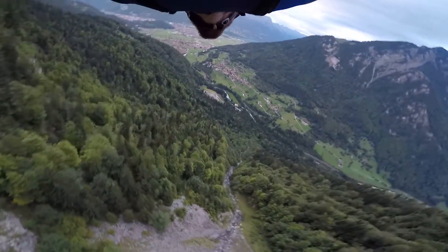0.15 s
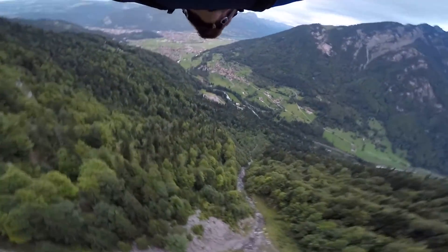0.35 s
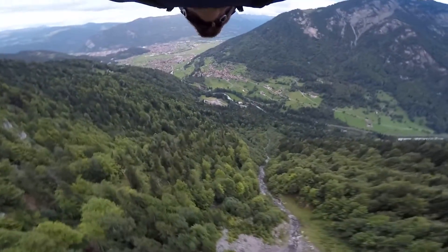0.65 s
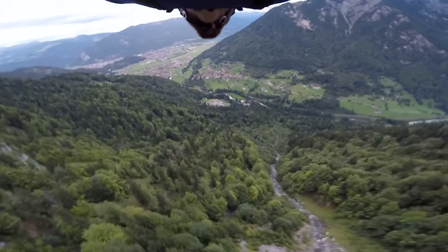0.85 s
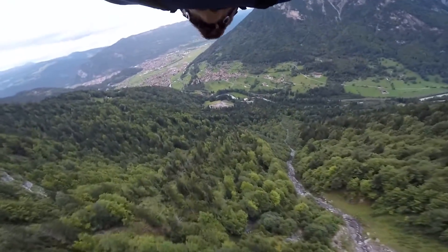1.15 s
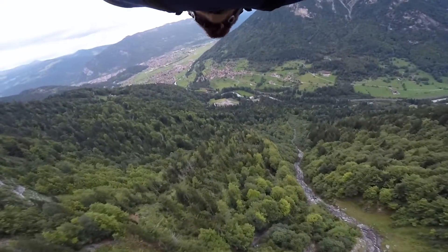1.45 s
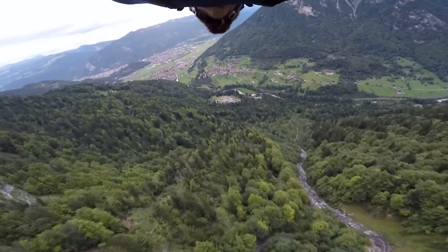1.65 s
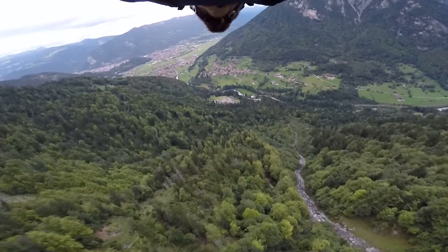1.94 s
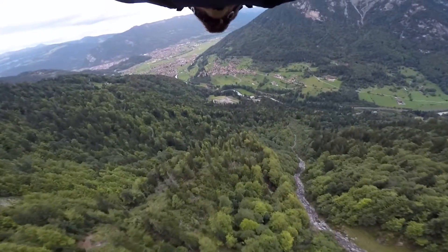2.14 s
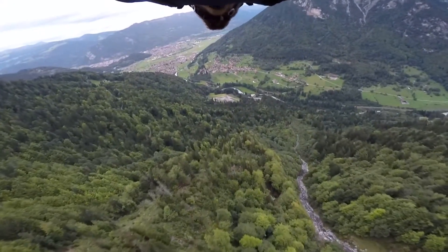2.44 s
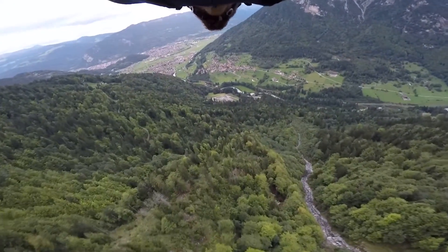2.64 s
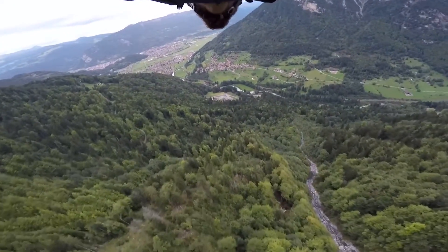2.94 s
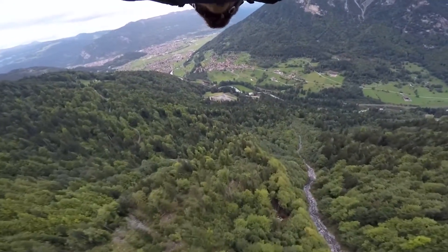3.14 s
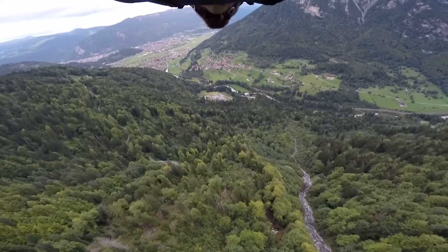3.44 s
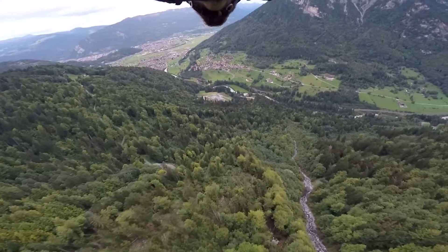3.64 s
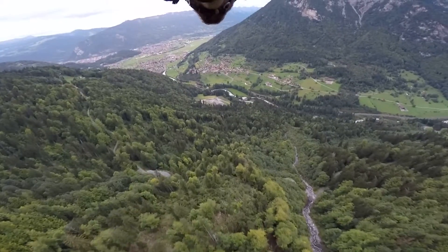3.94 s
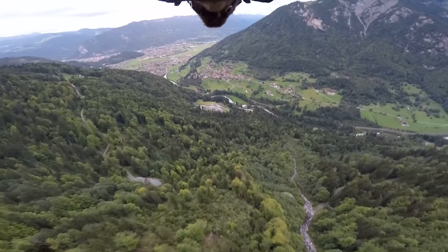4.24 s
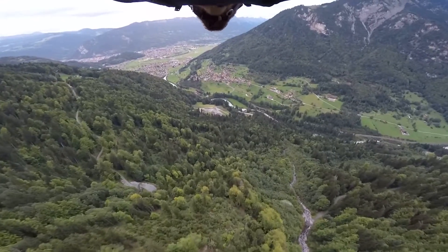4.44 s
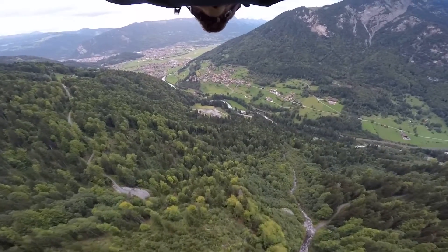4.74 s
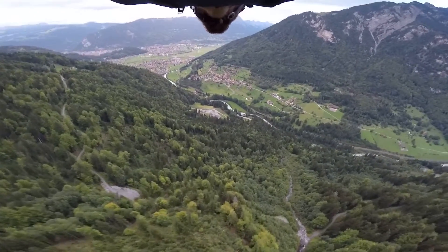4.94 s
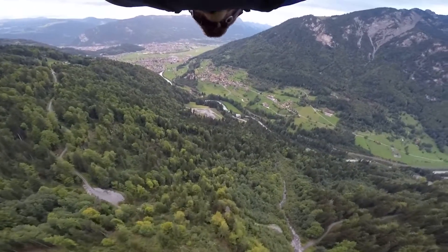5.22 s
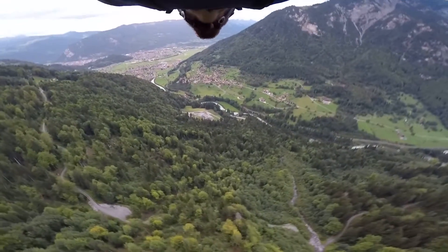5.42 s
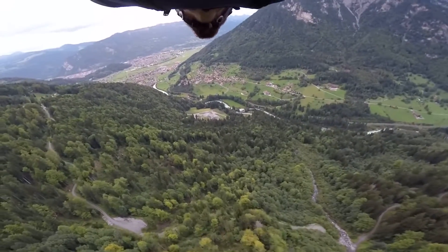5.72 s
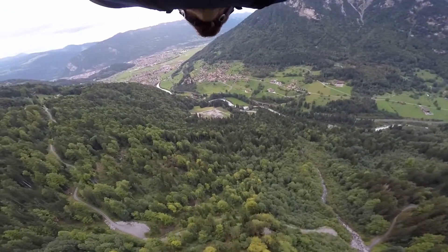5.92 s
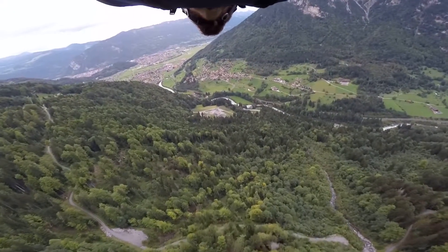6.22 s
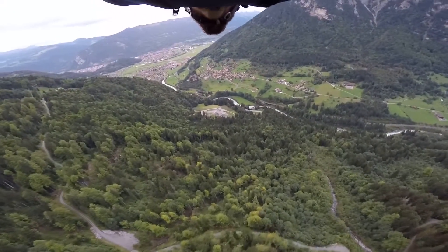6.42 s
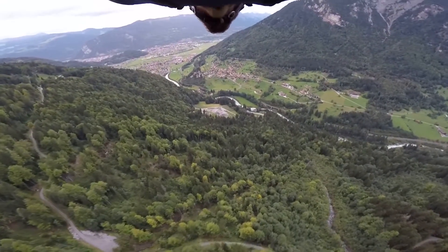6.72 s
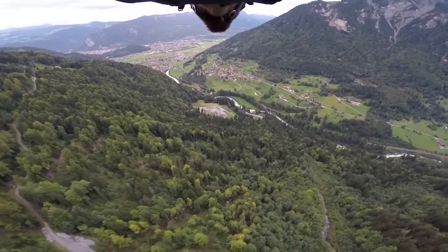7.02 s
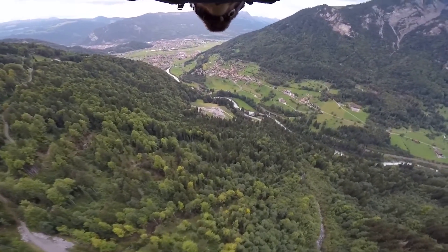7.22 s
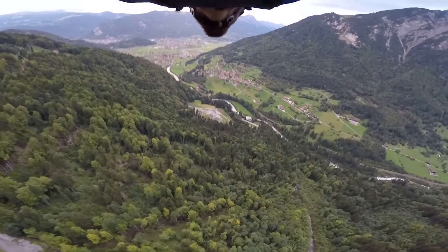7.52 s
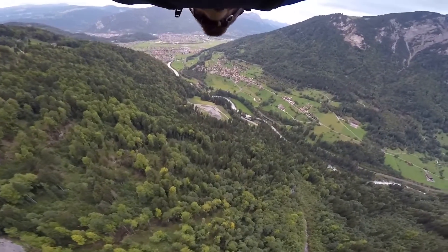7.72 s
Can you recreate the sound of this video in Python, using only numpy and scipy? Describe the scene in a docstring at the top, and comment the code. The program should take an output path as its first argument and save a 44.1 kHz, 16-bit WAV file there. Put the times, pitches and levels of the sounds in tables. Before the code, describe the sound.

A helmet microphone in fast gliding flight is overwhelmed by wind, very close, dry and loud, its peaks squeezed. At 0 seconds a hard gust hits with a sharp pop, more pops and brighter hiss, easing by about 0.6. From then on bass-heavy buffeting thumps and drums quickly without rhythm, with fluttering above it, a coarse low roar, a crackly mid rush and thin, ragged high hiss. Tiny spits and dry ticks scatter throughout. Flutter surges near 1 second; brief slaps lift the roar around 2.4 and 2.9, and again near 3.4 to 4.1. Pops return around 4.5 to 4.8, then a strong gust peaks at 5.2 amid a tight cluster of pops. The flow slackens, weakest around 6.5, though flutter stays strong to about 6 and spits continue. After 7 the hiss grows smoother, a pop lands near 7.6, and the wind swells until the end, just before 8.

```python
"""A hard gust with a sharp pop opens the scene: air rushes past a helmet camera in fast gliding flight.
The microphone sits in the housing, with no distance to the wind: large eddies buffet it in noise bands,
smaller ones roar in packets and now and then pop on the microphone port as short pressure pulses.
The port hisses and spits near its resonance in shaped noise bursts.
A quick limiter holds the peaks."""
import sys
import numpy as np
from scipy import signal
from scipy.fft import rfft, irfft, next_fast_len
from scipy.io import wavfile
from scipy.ndimage import uniform_filter1d, minimum_filter1d

SR = 44100
rng = np.random.default_rng(int(sys.argv[2]) if len(sys.argv) > 2 else 0)


def generate_wav(signal):
    """Clip the signal to [-1, 1] and save it as 16-bit WAV at the path in sys.argv[1]."""
    frames = np.transpose(np.atleast_2d(signal))
    scaled = np.clip(frames, -1, 1) * 32767
    pcm = np.round(scaled).astype(np.int16)
    wavfile.write(sys.argv[1], SR, pcm)


N = 347067

# strength of the airflow over the helmet, gusting at the start, at 5.2 s and at the end:
# time_s, level_db (about nominal flow)
FLOW = [(0, 5), (.26, 2), (.3, 1), (.58, 0), (.8, 1), (1.2, -1.1), (1.98, -1.5), (2.45, 1), (3.03, -1.5),
        (3.4, 1.4), (3.85, -0.4), (4.3, -0.5), (4.98, 2), (5.2, 4.5), (5.55, -0.5), (6.08, -0.5),
        (6.45, -2), (7.4, -0.9), (7.87, 4.5)]
# size of the large eddies, leaning from deep thumps (-) to higher drumming (+): time_s, lean_db
EDDY_LEAN = [(0, -2.0), (0.78, 1), (1.2, -1), (2.9, 0), (3.06, 2), (3.2, -1.6), (3.9, -1.5), (4.42, 1),
             (4.65, -0.5), (5.1, 0.8), (5.45, 1), (6.9, -0.5), (7.2, 2.5), (7.87, 1.9)]
# the deepest rumble, mostly below 60 Hz: time_s, level_db
RUMBLE_LEVEL = [(0, -23), (.42, -17.5), (.9, -26), (1.8, -22), (2.5, -27), (3.0, -23.5), (3.45, -25.5),
                (3.82, -22), (4.9, -27.5), (5.2, -21), (5.95, -21.5), (6.35, -28), (6.9, -18), (7.3, -25),
                (7.87, -20)]
# flutter around 200 Hz: time_s, level_db (about FLUTTER_DB)
FLUTTER_LEVEL = [(0, 1), (0.62, 1.1), (0.98, 2.5), (1.55, 3), (2.25, -1), (2.7, 1.8), (3.05, -3),
                 (3.7, -0.4), (4.85, -0.5), (5.25, 4), (6.0, 5), (6.5, -0.5), (7, -1), (7.25, -5),
                 (7.87, 4)]
# how ragged the flow over the port is: time_s, burst_share (of the hiss power, 0-1)
RAGGEDNESS = [(0, 0.8), (.7, 0.8), (1.3, 0.98), (1.85, 0.63), (2.75, 1), (3.05, 0.77), (3.7, 0.8),
              (4.7, 0.23), (5.3, 0.77), (6.1, 1), (6.8, 0.67), (7.3, 0.14), (7.87, 0.2)]

# the buffeting slackens or thumps harder: centre_s, width_s, rise_db
BUFFET_SWELLS = [(.18, .08, 1.8), (.57, 0.035, -5.5), (1.27, .025, 4.5), (1.57, .03, -2), (2.4, .1, 1.5),
                 (2.77, 0.033, 1), (2.98, .04, -3), (3.45, .035, 2.5), (3.62, 0.031, -2), (4.41, 0.037, -4),
                 (4.68, 0.049, -2), (5.12, 0.052, 1), (5.96, .035, -5), (6.33, 0.041, 1.5),
                 (6.88, 0.11, -3), (7.72, .12, -1.5)]
# the flutter surges or sags: centre_s, width_s, rise_db
FLUTTER_SURGES = [(.254, 0.01, 7), (.77, .04, 0.5), (.985, 0.04, 7), (1.39, 0.041, 5.5), (1.705, 0.021, 3),
                  (1.8, .025, 1.5), (2.18, 0.032, 6), (2.706, 0.0081, 5), (2.749, 0.0083, 4.5),
                  (3.448, 0.026, 8.5), (3.74, 0.043, 4.5), (5.29, 0.036, 4), (5.53, 0.058, 1.5),
                  (5.74, 0.022, -5.5), (5.86, 0.04, 1), (6.95, 0.052, 1), (7.37, .01, 7),
                  (7.54, 0.014, -0.5)]
# the low roar swells and sags by itself: centre_s, width_s, rise_db
ROAR_SWELLS = [(.72, 0.039, 3.5), (1.27, 0.11, 2), (1.93, .06, 0), (2.45, 0.025, -1), (3.63, 0.029, -1),
               (3.85, 0.047, 4.5), (4.16, 0.061, 3), (5.22, 0.047, 1), (6.02, 0.062, 0), (6.42, .04, -3.5),
               (7.23, 0.05, -2.5), (7.75, 0.2, -1.5)]
# larger eddies slap the housing and briefly lift roar and rush: centre_s, width_s, rise_db (of flow)
SLAPS = [(.37, 0.008, 5), (.885, 0.0091, 1.5), (2.428, 0.0066, 7), (2.469, 0.0089, 9.5), (2.95, 0.005, 7),
         (3.432, 0.0073, 2), (3.87, 0.035, 1.5), (4.14, 0.03, 2.2), (5.168, .01, 7), (5.441, 0.0046, 2),
         (7.087, 0.008, 5.5)]

# eddies bursting on the port, the smaller the sharper:
# centre_s, peak_db (before the rumble is cut), width_ms (before a random size)
POPS = [(0.011, -7, 0.24), (0.070, -12, 0.19), (0.134, -8, 0.19), (0.347, -8.5, 0.28), (1.4104, -11, 0.25),
        (2.0385, -13, 0.23), (2.4263, -9, 0.14), (2.4688, -16.5, 0.27), (2.9449, -15, .26),
        (3.6625, -10, .14), (3.881, -13, 0.14), (3.9548, -9.5, 0.2), (4.5195, -8, 0.25),
        (4.7279, -8.5, 0.17), (4.7665, -10.5, 0.18), (5.028, -4.5, 0.21), (5.1684, -10, 0.15),
        (5.18, -7.5, 0.12), (5.2617, -9, 0.12), (6.077, -17, 0.1), (6.222, -11, .21), (6.9403, -13, 0.17),
        (7.054, -12.5, 0.23), (7.083, -10.5, 0.17), (7.5853, -7.5, 0.17)]
# short spits of hiss: centre_s, crest_rms_db (before SPIT_TRIM_DB), width_ms,
# brightness_db (top sizzle against the port's resonance)
SPITS = [(0.026, -27, 1.3, -11), (0.069, -29, 1.5, -12), (0.088, -28, 0.73, -16.5), (0.173, -19, 0.76, -20),
         (0.198, -18.5, 0.82, -19), (0.263, -24, 1.8, -18), (0.444, -26, 1.2, -15.5),
         (0.465, -26, 1.1, -22), (1.0188, -24, 1, -20), (1.2347, -28, 1.4, -11),
         (1.2958, -24.5, 1.3, -16.5), (1.3302, -27, 0.74, -15), (1.4642, -30, .9, -15),
         (1.4803, -27, 0.6, -8), (2.1315, -27, 0.87, -14), (2.1396, -22, 1, -19.5), (2.3578, -23, .7, -12),
         (2.649, -29, 0.88, -15), (2.699, -30, 2.4, -10.5), (2.7533, -26.5, 1, -5),
         (3.1206, -26, 0.98, -20), (3.2426, -30, .9, -16), (3.4097, -25, 1, -20), (3.603, -25, .9, -16),
         (3.691, -26, 1, -26), (3.7994, -28, 0.67, -16), (3.9029, -23, .7, -11), (4.131, -24, 1, -18),
         (4.2042, -29, 0.77, -5), (4.3967, -28, .9, -16), (4.486, -30, 1, -8.5), (4.4987, -27.5, 1, -12),
         (4.5204, -28, .9, -19), (5.0904, -20.5, 1, -21), (5.2044, -23, 1, -16), (5.239, -23.5, 1.1, -19),
         (5.271, -23, .8, -18), (5.3661, -28, 1, -15), (5.6013, -29, 0.78, -4), (5.7042, -25, .7, -6),
         (5.826, -27, 0.88, -15), (5.841, -23, 1.1, -19), (6.1031, -17.5, 0.83, -18),
         (6.2265, -27, 0.43, -4), (6.491, -34, 0.79, -16), (6.661, -20.5, 0.61, -16),
         (6.7377, -23.5, .8, -9), (6.821, -26, .9, -19), (6.8648, -22.5, .8, -19), (6.908, -29, 1.2, -13.5),
         (7.1433, -29, .9, -18), (7.2495, -29, 1, -15)]

# spectrum of the deep rumble: pitch_hz, relative level_db
RUMBLE_COLOUR = [(10, -15), (24, -4.5), (40, -1.5), (52, 0.5), (68, -20), (100, -40)]
# spectrum of the deep thumps: pitch_hz, relative level_db
THUMP_COLOUR = [(20, -21), (38, -13), (50, -3.5), (62, 2.5), (80, 7), (96, -0.5), (112, -1.5), (160, -46)]
# spectrum of the higher drumming: pitch_hz, relative level_db
DRUM_COLOUR = [(70, -32.5), (98, -3.5), (125, -0.5), (140, -3), (160, -11.5), (220, -44)]
# spectrum of the flutter: pitch_hz, relative level_db
FLUTTER_COLOUR = [(110, -18.5), (145, -7), (170, 1.5), (210, 0.5), (260, -3.5), (320, -8), (390, -14.5),
                  (520, -30.5), (1200, -56)]
# spectrum of the low roar: pitch_hz, relative level_db
ROAR_COLOUR = [(220, -17), (340, -2), (430, -3), (620, -7), (800, -11), (980, -16.5), (1300, -22),
               (3000, -59)]
# spectrum of the rush: pitch_hz, relative level_db
RUSH_COLOUR = [(550, -15), (900, -0.5), (1100, 1.5), (1500, 0.5), (2000, -7), (2600, -11.5), (3200, -19.5),
               (4200, -19.5), (8000, -45)]
# spectrum of the crackle in the rush: pitch_hz, relative level_db
CRACKLE_COLOUR = [(300, -10), (800, 3.5), (1900, 0), (3000, -11.5), (4500, -9.5), (7000, -32.5)]
# spectrum of the smooth port hiss: pitch_hz, relative level_db
HISS_COLOUR = [(2500, -11), (3400, -13.5), (3950, -6.5), (4750, 1), (5400, -3.5), (6400, -3.5), (7300, -9),
               (8500, -15.5), (10000, -23), (12000, -35.5), (14500, -48.5)]
# spectrum of bursts and spits at the port's resonance: pitch_hz, relative level_db
SPIT_COLOUR = [(3000, -33.5), (4200, -7.5), (5050, 0.5), (6100, -4), (7000, -11), (8000, -20.5),
               (9400, -26), (10300, -33), (12000, -49), (14500, -60)]
# spectrum of the finest tears, above that resonance: pitch_hz, relative level_db
SIZZLE_COLOUR = [(5000, -23.5), (6500, 2.5), (7800, -1), (9400, -7.5), (10300, -11), (11500, -29.5),
                 (14000, -41.5)]

# each layer's level at nominal flow (dB), and how many dB it gains per dB of flow
BUFFET_DB, FLUTTER_DB = -12, -18.5
ROAR_DB, ROAR_FOLLOWS = -24, 1.1
RUSH_DB, RUSH_FOLLOWS = -31.5, 0.72
HISS_DB, HISS_FOLLOWS = -39, 0.46
RAGGED_HISS_DB = 0.4    # gain from wholly smooth to wholly ragged flow
SPIT_TRIM_DB = -3.5
# small random gusts on top of the flow
GUST_DB, GUST_HZ = 0.42, 13
# the opening gust rushes and hisses more brightly; the rush drops at once, the last of the hiss dies away
OPENING_HOLD_S = 0.25
OPENING_RUSH_DB, OPENING_DROP_S = 1.5, 0.008
OPENING_HISS_DB, OPENING_RELEASE_S = 1, 0.33
# the housing rings for a moment after a pop
POP_RING_HZ, POP_RING_T60_S, POP_RING_DB = 885, 0.008, -11
# the passing vortex displaces the finer turbulence (dB of flow)
POP_HUSH_S, POP_HUSH_DB = 0.008, -3.5
CUTOFF_HZ = 14750


def from_db(db):
    """Decibels to gain."""
    return 10 ** (np.asarray(db) / 20)


def rms_one(x):
    """Scale to unit power."""
    return x / np.sqrt(np.mean(x ** 2) + 1e-20)


def in_time(rows):
    """A level curve, interpolated at every sample."""
    time_s, level = np.transpose(rows)
    return np.interp(np.arange(N) / SR, time_s, level)


def swells(rows):
    """Smooth rises and falls of level, in dB at every sample."""
    t, out = np.arange(N) / SR, np.zeros(N)
    for centre_s, width_s, rise_db in rows:
        near = slice(*np.searchsorted(t, [centre_s - 4 * width_s, centre_s + 4 * width_s]))
        out[near] += rise_db * np.exp(-((t[near] - centre_s) / width_s) ** 2 / 2)
    return out


def coloured(x, colour):
    """Give a signal a spectrum; rms 1."""
    size = next_fast_len(N)
    hz = np.maximum(np.fft.rfftfreq(size, 1 / SR), 1)
    points_hz, points_db = np.transpose(colour)
    gain = from_db(np.interp(np.log(hz), np.log(points_hz), points_db))
    # fall away further beyond both ends of the table
    low_skirt = np.minimum(hz / points_hz[0], 1) ** 2
    high_skirt = np.minimum(points_hz[-1] / hz, 1) ** 2
    return rms_one(irfft(rfft(x, size) * gain * low_skirt * high_skirt, size)[:N])


def smooth(x, hz):
    """Weaken changes faster than hz, without delay."""
    lowpass = signal.butter(1, hz, fs=SR, output="sos")
    return signal.sosfiltfilt(lowpass, x, padtype="even", padlen=SR // 10)


def drift(hz):
    """Random wandering with rms 1."""
    return rms_one(smooth(rng.standard_normal(N), hz))


def turbulence(colour, swell_db):
    """Random pressure whose strength follows swell_db before it is coloured; rms 1."""
    return coloured(rng.standard_normal(N) * from_db(swell_db), colour)


def steadied(x, hz, share):
    """Shed eddies are of similar strength: even out part of the slow swings."""
    slow_power = smooth(x ** 2, hz) + 1e-6
    return rms_one(x / slow_power ** (share / 2))


def buffeting():
    """Large eddies thump or drum on the housing, trading power, with rumble below and flutter above."""
    lean_db = in_time(EDDY_LEAN)
    thumps = steadied(turbulence(THUMP_COLOUR, 0), hz=5.9, share=0.94)
    drumming = steadied(turbulence(DRUM_COLOUR, 0), hz=4, share=0.92)
    eddy_mix = from_db(-lean_db) * thumps + from_db(2.1 * lean_db) * drumming
    buffet = steadied(eddy_mix, hz=7.7, share=0.56)
    flutter = steadied(turbulence(FLUTTER_COLOUR, 1.73 * drift(hz=60.4)), hz=3.6, share=0.99)
    rumble = steadied(turbulence(RUMBLE_COLOUR, 0), hz=2.5, share=0.94)
    flutter_db = FLUTTER_DB + in_time(FLUTTER_LEVEL) + swells(FLUTTER_SURGES)
    return (from_db(BUFFET_DB + swells(BUFFET_SWELLS)) * buffet
            + from_db(in_time(RUMBLE_LEVEL)) * rumble
            + from_db(flutter_db) * flutter)


def grains(per_s, spread_db):
    """Clicks at random moments, of random sign and size."""
    size_db = spread_db * np.minimum(rng.exponential(1, N), 3)
    sizes = from_db(size_db) * rng.choice([-1, 1], N)
    return sizes * (rng.random(N) < per_s / SR)


def rushing(flow_db, blast_db, eddies):
    """Fine turbulence rides in millisecond packets with a sharp crackle in it, and grows with the flow."""
    packets = 1.6 * np.tanh(eddies / 1.6)   # bounded strength
    roar_swell_db = 2.84 * packets + 0.86 * drift(hz=24.9)
    roar = steadied(turbulence(ROAR_COLOUR, roar_swell_db), hz=4, share=0.5)
    rush_swell_db = 2.0 * packets + 2.0 * drift(hz=900)
    rush = steadied(turbulence(RUSH_COLOUR, rush_swell_db), hz=3.9, share=0.25)
    crackle = coloured(grains(per_s=330, spread_db=3.4), CRACKLE_COLOUR)
    roar_db = ROAR_DB + ROAR_FOLLOWS * flow_db + swells(ROAR_SWELLS)
    rush_db = RUSH_DB + RUSH_FOLLOWS * flow_db + blast_db
    return from_db(roar_db) * roar + from_db(rush_db) * (rush + from_db(-6.0) * crackle)


def port_hiss(hiss_db, eddies, pressure):
    """Smooth hiss and ragged bursts at the port's resonance, most on the crests of the buffeting."""
    share = in_time(RAGGEDNESS)
    crests = np.maximum(rms_one(pressure), 0)
    raggedness = 0.41 * drift(hz=180) + 0.17 * drift(hz=30) + 0.61 * crests - 0.2
    bursts = steadied(turbulence(SPIT_COLOUR, 8.9 * np.tanh(raggedness)), hz=0.6, share=0.41)
    # the smallest eddies tick with their own rapid drift, higher up
    tick_db = 19 * np.tanh(0.5 * drift(hz=350) + 0.2 * crests - 0.7)
    sizzle = turbulence(SIZZLE_COLOUR, tick_db)
    hiss = turbulence(HISS_COLOUR, 1.5 * eddies)
    mix = np.sqrt(1 - share) * hiss + np.sqrt(share) * bursts + from_db(-13.0) * share * sizzle
    return from_db(hiss_db + RAGGED_HISS_DB * share) * mix


def pops():
    """A small vortex crossing the port dips the pressure, which rebounds; the housing rings briefly."""
    pulses, t = np.zeros(N), np.arange(N) / SR
    random_sizes = rng.uniform(0.9, 1.15, len(POPS))
    for (centre_s, peak_db, width_ms), size in zip(POPS, random_sizes):
        near = slice(*np.searchsorted(t, [centre_s - 0.01, centre_s + 0.01]))
        u = 1000 * (t[near] - centre_s) / (width_ms * size)   # time in pulse widths
        pulses[near] += from_db(peak_db) * u * np.exp((1 - u ** 2) / 2)
    decay = np.exp(-np.log(1000) / (POP_RING_T60_S * SR))   # per sample
    resonator = [1, -2 * decay * np.cos(2 * np.pi * POP_RING_HZ / SR), decay ** 2]
    ring = signal.lfilter([0, 1], resonator, pulses + 1e-18)
    ringing_pops = pulses + from_db(POP_RING_DB) * np.std(pulses) * rms_one(ring)
    # so small a vortex carries no rumble
    return signal.sosfilt(signal.butter(2, 250, "high", fs=SR, output="sos"), ringing_pops)


def spits():
    """Flow tears at the port's edge for milliseconds, sounding its resonance with finer sizzle above."""
    body, top, t = np.zeros(N), np.zeros(N), np.arange(N) / SR
    for centre_s, crest_db, width_ms, bright_db in SPITS:
        near = slice(*np.searchsorted(t, [centre_s - 0.01, centre_s + 0.01]))
        burst = from_db(crest_db) * np.exp(-(1000 * (t[near] - centre_s) / width_ms) ** 2 / 2)
        body[near] += burst
        top[near] += burst * from_db(bright_db)
    out = np.zeros(N)
    for level, colour in ((body, SPIT_COLOUR), (top, SIZZLE_COLOUR)):
        noise = level * rng.choice([-1, 1], N)
        out += np.sqrt(np.mean(level ** 2)) * coloured(noise, colour)
    return from_db(SPIT_TRIM_DB) * out


def scene():
    """All the wind at one microphone; one airflow drives roar, rush and hiss."""
    flow_db = in_time(FLOW) + GUST_DB * drift(hz=GUST_HZ)
    after_s = np.arange(N) / SR - OPENING_HOLD_S
    blast_db = OPENING_RUSH_DB * np.clip(1 - after_s / OPENING_DROP_S, 0, 1)
    opening_hiss_db = OPENING_HISS_DB * np.clip(1 - after_s / OPENING_RELEASE_S, 0, 1)
    hiss_db = HISS_DB + HISS_FOLLOWS * flow_db + blast_db + opening_hiss_db
    hush_db = swells([(centre_s, POP_HUSH_S, POP_HUSH_DB) for centre_s, _, _ in POPS])
    fine_flow_db = flow_db + swells(SLAPS) + hush_db
    eddies = drift(hz=205)   # shared by roar, rush and hiss
    pressure = buffeting()
    wind = pressure + rushing(fine_flow_db, blast_db, eddies) + port_hiss(hiss_db, eddies, pressure)
    return (wind + pops() + spits())[None]


def limiter(x, ceiling_db, release_db_per_s):
    """The gain ducks just ahead of each peak and recovers steadily."""
    over_db = np.maximum(20 * np.log10(np.abs(x) + 1e-9) - ceiling_db, 0)
    widened_db = -minimum_filter1d(-over_db, size=129)   # look ahead and behind
    fall_db = release_db_per_s * np.arange(N) / SR
    held_db = np.maximum.accumulate(widened_db + fall_db, axis=-1) - fall_db
    return x * from_db(-uniform_filter1d(held_db, size=129))


def record(dry):
    """The camera microphone's signal: peaks are limited, then the top is cut."""
    held = limiter(dry, ceiling_db=-0.6, release_db_per_s=149)
    return signal.sosfilt(signal.cheby2(12, 70, CUTOFF_HZ, fs=SR, output="sos"), held)


dry = scene()
out = record(dry)
generate_wav(out)
```